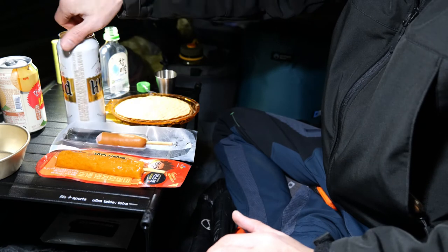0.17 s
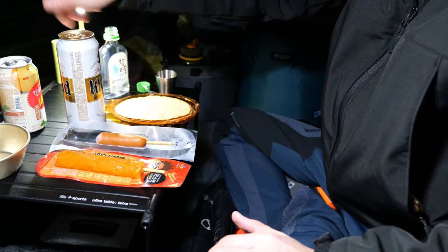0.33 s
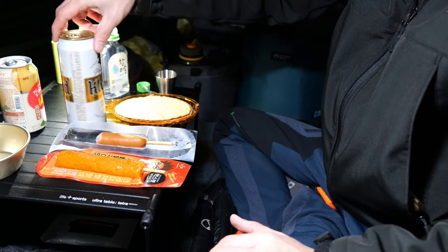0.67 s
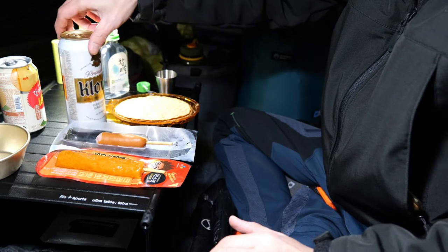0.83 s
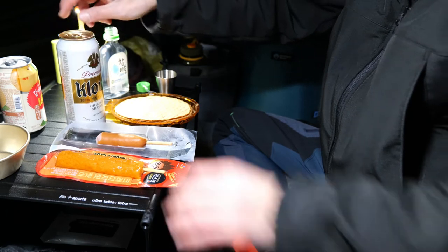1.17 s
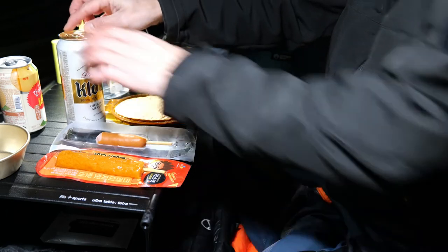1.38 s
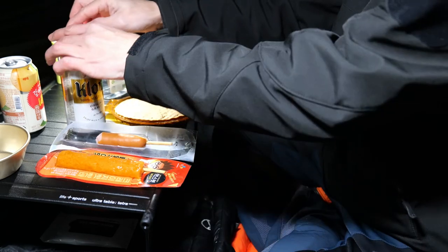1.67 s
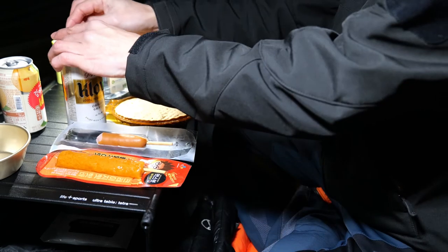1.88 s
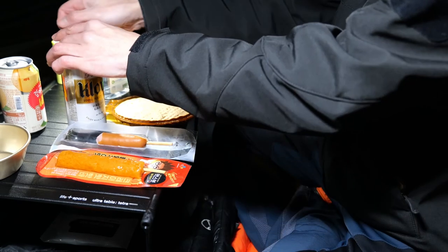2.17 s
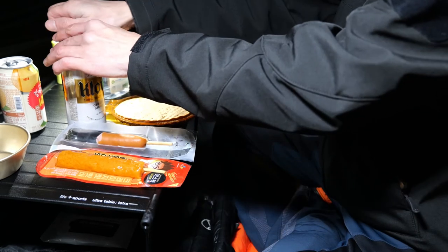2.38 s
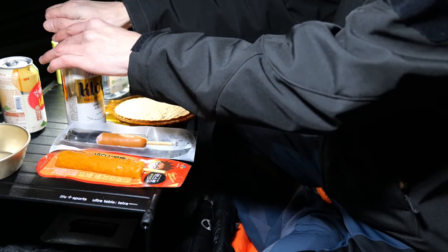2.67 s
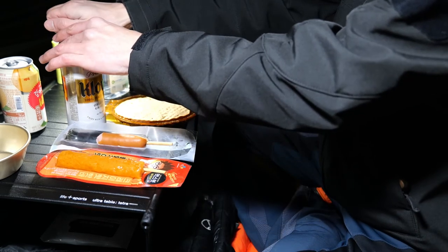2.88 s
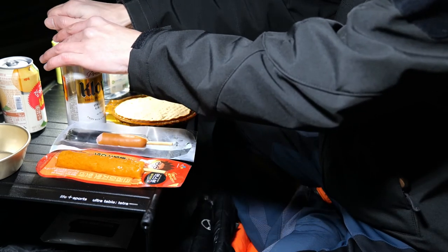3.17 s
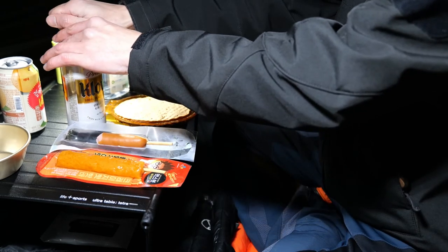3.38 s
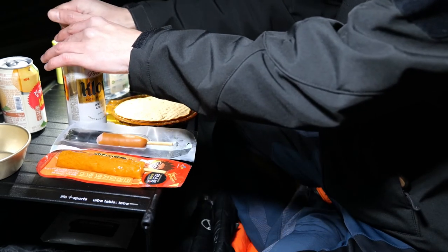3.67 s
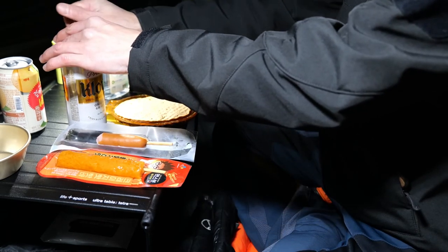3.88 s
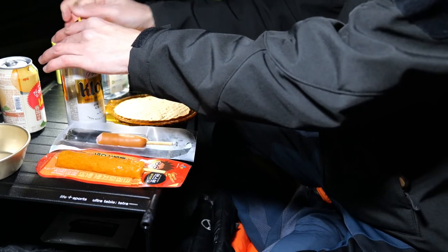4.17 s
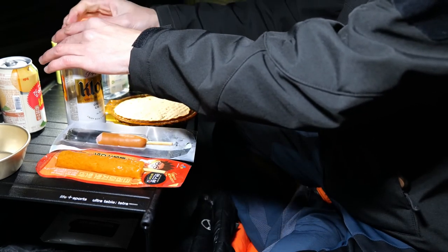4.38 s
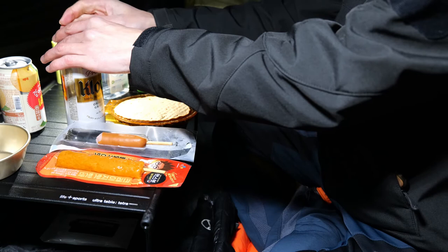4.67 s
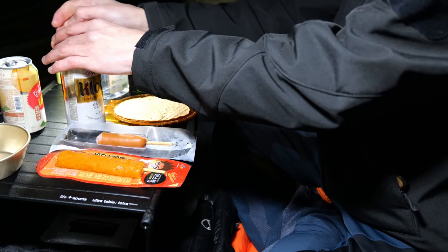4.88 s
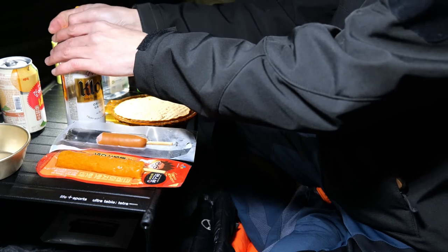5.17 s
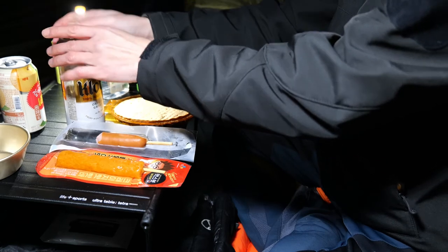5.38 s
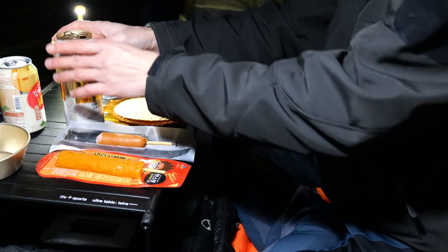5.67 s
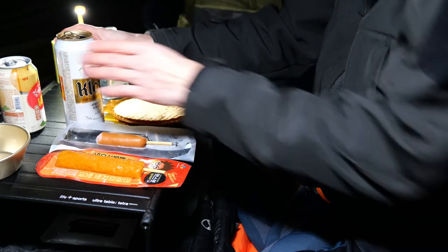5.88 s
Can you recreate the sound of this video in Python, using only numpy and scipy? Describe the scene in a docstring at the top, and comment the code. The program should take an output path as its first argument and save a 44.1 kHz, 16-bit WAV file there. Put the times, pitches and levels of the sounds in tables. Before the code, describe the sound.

Very close, outdoors on a quiet night. A full can drags and knocks briefly over a slatted metal table, twice. Nylon sleeves rustle with small taps. Then the ring pull cracks, gas hisses for under half a second, and two very loud metallic snaps tear the lid, the last distorting. The opened can rings faintly, small ticks follow, and a sleeve swishes at the end.

```python
"""Outdoors at night, a slatted metal camp table, heard up close in narrow stereo. A hand slides a full drink
can over the slats, whose modes ring, then levers its ring pull: a crack, a jet of gas (shaped noise), two loud
snaps as the lid tears, small ticks of the tab (bursts and damped modes). The drag hisses and nylon sleeves rustle
in grainy noise; the air is quiet noise with a faint wavering hum. The loudest snaps are clipped at full scale."""
import sys
import numpy as np
from scipy import signal
from scipy.fft import rfft, irfft
from scipy.io import wavfile
from scipy.ndimage import uniform_filter1d

SR = 44100
rng = np.random.default_rng(int(sys.argv[2]) if len(sys.argv) > 2 else 0)


def dump_mix(stems):
    """Bounce the given channels to the path in sys.argv[1] as a 16-bit WAV at rate SR."""
    frames = np.atleast_2d(stems).T  # one column per channel
    limited = np.clip(frames, -1, 1)  # hard clip at full scale
    pcm = np.round(limited * 32767).astype(np.int16)
    wavfile.write(sys.argv[1], SR, pcm)


N = 265834  # samples


def amp(db):
    """Amplitude factor of a level in dB."""
    return 10 ** (np.asarray(db) / 20)


def evened(x):
    """Scales x to an rms of 1."""
    return x / np.sqrt(np.mean(x ** 2) + 1e-20)


def read(points, hz):
    """Reads a curve of (f/Hz, dB) points, straight over log frequency."""
    f, value = np.transpose(points)
    return np.interp(np.log(hz + 1), np.log(f + 1), value)


def add(mix, s, sound):
    """Lays a sound into the mix from s seconds on."""
    part = mix[max(round(s * SR), 0):][:len(sound)]
    part += sound[:len(part)]


def octaves(hz):
    """Distance from about 4 kHz in octaves, eased in the deep bass."""
    return np.log2((hz + 50) / 4000)


def resonate(x, hz, width):
    """Resonance: shifts the curve hz down to zero, smooths, and shifts back."""
    turn = np.exp(2j * np.pi * np.cumsum(hz * np.ones(len(x))) / SR)
    r = np.exp(-np.pi * width / SR)
    return 2 * (turn * signal.lfilter([1 - r], [1, -r], x / turn)).real


def noise(colour_db, tilt, patchy_db, flicker_db):
    """Random short-time spectra of rms 1 with patches, flicker and a tilt (dB per octave) that moves in time."""
    size, hop = 512, 128  # samples
    frames, hz = N // hop + 5, np.fft.rfftfreq(size, 1 / SR)
    real, imaginary, patches = rng.standard_normal((frames, len(hz), 3)).T
    patches = uniform_filter1d(patches, size=6, axis=0)  # over frequency
    patches = evened(uniform_filter1d(patches, size=14, axis=1))  # over time
    flicker = evened(uniform_filter1d(rng.standard_normal(frames), size=2))
    frame_tilt = tilt[np.minimum(np.arange(frames) * hop, N - 1)]
    shape = amp(colour_db(hz)[:, None] + np.outer(octaves(hz), frame_tilt))
    shape = shape / np.sqrt((shape ** 2).mean(axis=0))  # the tilt leaves the level alone
    shape = shape * amp(patchy_db * patches + flicker_db * flicker)
    spectra = (real + 1j * imaginary) * shape
    return evened(signal.istft(spectra, nperseg=size, noverlap=size - hop)[1][:N])


def played(rows):
    """Gain and tilt over time of strokes that rise, hold and fall smoothly."""
    t = np.arange(N) / SR
    s, rise, hold, fall, db, tilt = np.transpose(rows)[:, :, None]
    end = s + rise + hold + fall
    opened = np.clip(np.minimum((t - s) / rise, (end - t) / fall), 0, 1)
    gain = amp(db) * np.sin(np.pi / 2 * opened) ** 2
    total = gain.sum(axis=0)
    return total, (gain * tilt).sum(axis=0) / (total + 1e-9)


# Loss at the top of every snap: f/Hz, level/dB
SNAP_TOP = [(13000, 0), (15000, -3), (16500, -25)]
SKIRT = 0.8  # the loss grows as this power of the distance in octaves


def skirts(hz, centre_hz, below_db, above_db):
    """Loss in dB on either side of a snap's centre frequency."""
    away = np.log2((hz + 50) / centre_hz)
    return -np.where(away < 0, below_db, above_db) * abs(away) ** SKIRT + read(SNAP_TOP, hz)


# Snaps and ticks of lid and tab: t/s, level/dB, centre f/Hz, loss an octave below/dB, loss an octave above/dB,
# damping by the fingers (factor on ring time)
SNAPS = [(0.284, -34.5, 3010, 10, 19, 0.96), (0.814, -24.5, 2400, 16, 10.5, 0.73),
         (1.864, -41.5, 1210, 15, 5.5, 1), (1.9196, -33.5, 2400, 17, 8.5, 1),
         (1.957, -40, 2400, 11, 6, .75), (2.3168, 1, 3950, 27, 13.5, 0.61),
         (2.9938, 1, 4950, 7, 15.5, 0.77), (3.106, -30.5, 3860, 22, 20, 1),
         (3.1532, -33.5, 3850, 20, 27, 1), (3.184, -22, 3900, 8, 15.5, .88), (3.1956, -31, 3800, 5, 19, 1),
         (3.2257, -29, 1200, 2, 10, 1), (3.2381, 11.5, 2810, 12.5, 12, .42),
         (3.4553, -44.5, 2400, 14, 5, 1), (3.5117, -38.5, 3800, 4, 1, 0.56),
         (3.5717, -30.5, 7500, 1, 0, 0.78), (3.596, -34, 7500, 2.5, 2, .85),
         (3.6304, -51, 7500, 5.5, 10, .85), (3.916, -32, 3010, 7, 12, 0.74),
         (4.22, -44.5, 8300, 3.5, 4.5, .83), (4.2434, -46, 12000, 6.5, 3, .88),
         (5.0342, -25, 1500, 18.5, 3.5, .64), (5.26, -43, 2400, 8.5, 10, .76)]
# Modes of the lid, before damping: f/Hz, level/dB, t60/s
LID_MODES = [(560, -1, .035), (700, -3, .03), (1000, -1, .04), (1380, -1, .03), (1890, -4, .03),
             (2135, -4, .03), (2500, -3, .03), (2640, -.1, .035), (3220, -3, .035), (3415, -4, .04),
             (3820, -.1, .025), (4150, -5, .04), (4520, -7, .04), (4900, -1, .035), (5360, -3, .045),
             (5700, -6, .04), (6100, -6, .04), (6700, -3, .03), (7150, -1, .03), (7800, -3, .03),
             (8240, -2, .028), (8790, -1, .025), (9290, -3, .025), (9850, -3, .025), (10500, -3, .022),
             (11500, -1, .02), (12600, -2, .018), (13600, -2, .018), (14600, -2, .018)]
SNAP_RISE_MS = .45
CRACK_DB, CRACK_T60 = -11, 0.021  # dB, s


def lid():
    """Each snap is a short crack that rings the lid's modes, weighted by where and how it tears."""
    out, t = np.zeros(N), np.arange(4096) / SR
    hz, mode_db, t60 = np.transpose(LID_MODES)
    bins = np.fft.rfftfreq(len(t), 1 / SR)
    rise = 1 - np.exp(-(1e3 * t / SNAP_RISE_MS) ** 2)
    for s, db, *colour, damping in SNAPS:
        # each snap's high modes are detuned at random
        detuned_hz = hz * (1 + .02 * np.clip(octaves(hz), 0, 2) * rng.standard_normal(len(hz)))
        phase = 0.72 * rng.standard_normal((len(hz), 1))
        ring_t60 = max(damping, .1) * t60[:, None]
        level = amp((mode_db + skirts(hz, *colour))[:, None] - 60 * t / ring_t60)
        ring = (level * np.sin(2 * np.pi * np.outer(detuned_hz, t) + phase)).sum(axis=0)
        bass_loss = 2 * np.minimum(octaves(bins) + 1.5, 0)
        crack_shape = amp(skirts(bins, *colour) + bass_loss)
        crack = evened(irfft(rfft(rng.standard_normal(len(t))) * crack_shape))
        snap = rise * (ring / 2 + crack * amp(CRACK_DB - 60 * t / CRACK_T60))
        add(out, s, amp(db) * snap)
    return out


# Brief rips of the scored metal: t/s, length/ms, level/dB, centre f/Hz, spread/octaves
TEARS = [(2.324, 11.5, -32.5, 4500, 0.44), (2.9919, 2, -15.5, 3930, 0.47), (2.997, 24.5, -28.5, 5190, 0.5),
         (3.028, 15.4, -27, 5000, 0.26), (5.033, 5.4, -34, 1850, 0.22), (3.186, 17, -40.5, 4000, 0.78),
         (3.2354, 4.9, -13, 2454, 1.1), (3.2416, 7, -16.5, 3600, 0.51), (3.248, 10.5, -31, 6010, .6),
         (3.514, 12, -53, 8000, 1.3)]


def rips():
    """Tearing metal: a noise burst drives the lid's modes around one centre."""
    hz, mode_db, t60 = np.transpose(LID_MODES)
    out, t = np.zeros(N), np.arange(1500) / SR
    for s, ms, db, centre_hz, spread in TEARS:
        near_db = -3.8 * (np.log2(hz / centre_hz) / spread) ** 2
        level = amp((mode_db + near_db)[:, None] - 60 * t / (.4 * t60[:, None]))
        ring = (level * np.sin(2 * np.pi * np.outer(hz, t))).sum(axis=0)
        drive = rng.standard_normal(len(t)) * np.sin(np.pi * np.clip(1e3 * t / ms, 0, 1)) ** 1.3
        add(out, s, amp(db) * signal.fftconvolve(drive, ring / np.linalg.norm(ring)))
    return out


# Close mode pairs of the opened can: f/Hz, beats per second, first swell after the start t/s, level/dB, t60/s
WALL_MODES = [(1005, 15, .03, -26, 0.42), (522, 11.5, .065, -33, 0.58), (383, 8, .035, -37, 1),
              (930, 12, .03, -44, .3), (317, 9.3, 0.046, -43, 1.6), (275, 6, 0.073, -47, 1.1),
              (1125, 30, 0.042, -37, 0.14), (1360, 25, .022, -38, .12)]
WALL_START = 3.24  # s


def can_wall():
    """The opened can rings on: pairs of modes a few hertz apart swell and fade as they die away."""
    out, t = np.zeros(N), np.arange(SR) / SR
    rise = 1 - np.exp(-t / .05)
    for hz, beats, swell_s, db, t60 in WALL_MODES:
        beating = np.cos(np.pi * beats * (t - swell_s))
        add(out, WALL_START, amp(db - 60 * t / t60) * beating * np.sin(2 * np.pi * hz * t) * rise)
    return out


# Gas, the long first jet and a puff as the lid tears: start t/s, rise/s, hold/s, fall/s, level/dB,
# treble tilt/dB per octave
JETS = [(2.355, 0.055, 0.17, 0.17, -35.5, 0.55), (2.995, .004, 0.019, 0.053, -43.5, 2)]
# Relative spectrum of the jet: f/Hz, level/dB per Hz
JET_COLOUR = [(290, -29), (500, -10), (1620, -11.5), (1870, -7), (2070, -9), (3390, -3.5), (4150, -1),
              (5800, -8.5), (8450, -1.5), (10800, -6.5), (13400, -7.5), (15300, -11), (16000, -40)]
# Dips and peaks that lid and cupped hands put on it: f/Hz, width/Hz, level/dB
JET_SHAPE = [(3360, 91, -25), (5740, 180, -5), (7500, 130, -13), (10760, 330, -12), (13700, 150, -10),
             (5080, 230, 3.5)]


def gas():
    """Turbulent jet through the slit: noise coloured by lid and hands."""
    def colour_db(hz):
        bumps_db = sum(db * np.exp(-((hz - f) / w) ** 2) for f, w, db in JET_SHAPE)
        return read(JET_COLOUR, hz) + bumps_db
    gain, tilt = played(JETS)
    return gain * noise(colour_db, tilt, patchy_db=1.1, flicker_db=0.7)


# The can's base drags on the slats: start t/s, rise/s, hold/s, fall/s, drive level/dB, treble tilt/dB per octave
DRAGS = [(0, 0.0023, 0.027, 0.11, -41, 3.5), (.1, 0.017, 0.037, 0.078, -39.5, 0.5),
         (.648, .012, 0.023, 0.12, -39, -1), (.76, 0.035, .005, .1, -42.5, -2)]
# Modes of the table's slats, before damping: f/Hz, relative level/dB, t60/s
SLAT_MODES = [(353.5, -1, 0.33), (448, -6, 0.14), (621, -4, 0.056), (945, -8, .1), (1208, -7, 0.15),
              (1390, 3, 0.038), (1584, -5.5, 0.13), (1910, -12, 0.083), (2345, -6.5, 0.16),
              (2740, -15.5, 0.11), (3250, -16, 0.08), (4060, -19, 0.06), (5420, -15, 0.074),
              (8330, -24, 0.072)]


def table():
    """Uneven slips of the dragged can ring the slats, which its weight damps."""
    gain, tilt = played(DRAGS)
    size = amp(4.3 * np.minimum(rng.exponential(1, N), 3))
    slips = size * (rng.random(N) < 900 / SR) * rng.choice([-1, 1], N)  # about 900 a second
    drive = gain * evened(slips)
    out, t = np.zeros(N), np.arange(SR // 2) / SR
    for hz, db, t60 in SLAT_MODES:
        mode = amp(-60 * t / (0.59 * t60)) * np.sin(2 * np.pi * hz * t)
        tilted = drive * amp(tilt * (octaves(hz) + 2.5))
        out += amp(db - 9) * signal.oaconvolve(tilted, mode / np.linalg.norm(mode))[:N]
    return out


# The can bumps a slat: t/s, level/dB, treble tilt/dB per octave, time until the can's weight stills the ring/s
BUMPS = [(0.0, -26, -4, 0.029), (0.12, -33, 0.5, 0.093), (0.657, -31.5, -5, 0.011),
         (0.688, -31.5, -2.5, 0.0092), (0.779, -44.5, 0, .03), (0.832, -53, 2, 0.076)]


def bumps():
    """A bump starts all slat modes at once; they are stilled after a moment."""
    hz, mode_db, t60 = np.transpose(SLAT_MODES)
    out, t = np.zeros(N), np.arange(SR // 5) / SR
    for s, db, tilt, still_s in BUMPS:
        turn = rng.random((len(hz), 1))
        level = amp((mode_db + tilt * (octaves(hz) + 4.5))[:, None] - 60 * t / (1.3 * t60[:, None]))
        ring = (level * np.sin(2 * np.pi * (np.outer(hz, t) + turn))).sum(axis=0)
        stilled_db = -60 * np.maximum(t - still_s, 0) / 0.027
        add(out, s, amp(db + stilled_db) * np.minimum(t / 0.0013, 1) * ring)
    return out


# Dull knocks of can, fingers and cuffs: t/s, peak level/dB, f/Hz
KNOCKS = [(0.118, -21.5, 1390), (0.283, -33.5, 1146), (0.291, -36, 767), (0.658, -39, 377),
          (0.686, -30, 1275), (0.75, -34.5, 1560), (0.779, -36, 1370), (0.829, -34, 2000),
          (0.969, -31.5, 610), (0.97, -37, 1360), (1.005, -36.5, 340), (1.029, -37.5, 960),
          (1.129, -43, 404), (1.176, -42.5, 600), (1.201, -41, 690), (1.223, -31.5, 1000),
          (1.251, -32, 880), (1.347, -37.5, 791), (1.399, -41, 390), (1.444, -42, 1540), (1.479, -43, 340),
          (1.573, -33, 530), (1.955, -41, 1420), (3.031, -36, 640), (3.106, -41, 637), (3.183, -35.5, 644),
          (3.198, -41.5, 680), (3.238, -19, 559), (3.969, -44, 380), (4.218, -41.5, 1640),
          (5.033, -36, 1200), (5.366, -39, 956), (5.483, -42.5, 707), (5.532, -47, 636),
          (5.868, -36.5, 338), (5.883, -39.5, 1090), (5.964, -38, 1980), (5.987, -34, 930),
          (6.01, -33.5, 825)]
KNOCK_T60, BODY_HZ, BODY_DB = 0.033, 436, -10.5  # s, Hz, dB against the tone


def knocks():
    """Quickly damped thumps: a tone over a shared low body, with a shorter tick above."""
    out, t = np.zeros(N), np.arange(SR // 5) / SR
    envelope = amp(-60 * t / KNOCK_T60) * (1 - np.exp(-(t / 0.00092) ** 2))
    body = amp(BODY_DB) * np.sin(2 * np.pi * BODY_HZ * t)
    for s, db, hz in KNOCKS:
        tone = np.sin(2 * np.pi * hz * t)
        tick = np.sin(2 * np.pi * 1.5 * hz * t) * amp(-6.5 - 60 * t / .008)
        knock = envelope * (body + tone + tick)
        add(out, s, amp(db) * knock / abs(knock).max())
    return out


# Strokes of rubbing noise, the hiss of the dragged can (first two), then sleeves: start t/s, rise/s, hold/s,
# fall/s, level/dB, treble tilt/dB per octave
RUBS = [(0, 0.0017, 0.1, 0.12, -44, -1), (.645, 0.027, .01, 0.34, -49.5, -1),
        (.94, 0.071, 0.083, .05, -51, 0), (1.13, 0.26, 0.027, 0.28, -48, 0.16),
        (1.84, .1, .01, 0.41, -60.5, 3), (3.25, 0.026, 0.24, 0.26, -54, -0.5),
        (4.1, 0.15, 0.92, .2, -66.5, 2.5), (5.3, 0.16, 0.2, .1, -57.5, .8),
        (5.66, 0.31, .2, 0.06, -43, 1.3)]
# Relative spectrum of the rubbing: f/Hz, level/dB per Hz
RUB_COLOUR = [(120, -9), (200, -20.5), (387, 2), (968, -10.5), (1040, -2.5), (2130, -10), (3970, -11),
              (6050, -21), (8900, -19), (14300, -35.5), (16000, -48.5)]
# The weave sings as the sleeve speeds up: t/s, f/Hz, level/dB
ZIP = [(5.77, 583, -52.5), (5.836, 676, -45), (5.884, 1160, -48.5), (5.904, 1060, -39), (5.95, 1460, -49),
       (5.98, 2260, -45), (6.0, 2460, -45)]
CRACKLES_PER_S, CRACKLES_DB = 180, -9.5  # level against the rubbing noise


def rubbing():
    """Drag hiss and sleeves: noise with dull crackles, and a fuzzy rising tone where the weave slides fast."""
    gain, tilt = played(RUBS)
    size = amp(6.4 * np.minimum(rng.exponential(1, N), 4)) * (rng.random(N) < CRACKLES_PER_S / SR)
    kind = rng.integers(0, 4, N)
    crackles = np.zeros(N)
    for k, hz in enumerate([420, 750, 1273, 2210]):
        crackles += resonate(resonate(size * (kind == k), hz, .6 * hz), hz, .6 * hz)
    grain = noise(lambda hz: read(RUB_COLOUR, hz), tilt, patchy_db=1.5, flicker_db=0.8)
    rub = gain * (grain + amp(CRACKLES_DB) * evened(crackles))

    s, hz, db = np.transpose(ZIP)
    t = np.arange(s[0], s[-1], 1 / SR)
    uneven = evened(uniform_filter1d(rng.standard_normal(len(t)), size=300))  # the stroke stutters
    pitch = np.interp(t, s, hz) * (1 + .035 * uneven)
    tone = evened(resonate(resonate(rng.standard_normal(len(t)), pitch, 120), pitch, 240))
    add(rub, s[0], amp(np.interp(t, s, db)) * tone * signal.windows.tukey(len(t), .1))
    return rub


# Relative spectrum of the night air: f/Hz, level/dB per Hz
AIR = [(12, -42), (20, -10), (68, -24), (98, 2), (116, -2), (130, -3.5), (198, -37.5), (270, -1.5),
       (446, -8.5), (485, -8.5), (1260, -7.5), (1960, -12.5), (5380, -22), (13500, -38), (16000, -40.5)]
# Relative spectrum of the faint noise of opposite sign left and right: f/Hz, level/dB per Hz
SIDE_NOISE = [(12, -36.5), (20, 6), (607, 2), (976, -12), (1610, -20.5), (3340, -22.5), (4420, -25),
              (4810, -25), (6010, -28), (6540, -6), (16000, -3.5)]
AIR_DB, SIDE_NOISE_DB = -53, -72.5  # rms
HUM_HZ, HUM_WIDTH, HUM_DB = 104.5, 16, -64.5  # Hz, Hz, dB rms


def night_air():
    """Quiet wide noise with a hum of narrow, wavering noise; fainter noise of opposite sign left and right."""
    flat = np.zeros(N)
    air = amp(AIR_DB) * noise(lambda hz: read(AIR, hz), flat, patchy_db=0.52, flicker_db=1.13)
    hum = resonate(rng.standard_normal(N), HUM_HZ, HUM_WIDTH)
    hum = evened(resonate(hum, HUM_HZ, HUM_WIDTH))
    side = amp(SIDE_NOISE_DB) * noise(lambda hz: read(SIDE_NOISE, hz), flat, patchy_db=1.5, flicker_db=.5)
    return air + amp(HUM_DB) * hum + np.outer([1, -1], side)


NEARBY_DB, NEARBY_T60 = -20.5, 0.13  # dB, s


def nearby(x):
    """Short scatter off table, bottles and bodies: a decaying noise tail."""
    t = np.arange(SR // 4) / SR
    tail = rng.standard_normal(len(t)) * amp(-60 * t / NEARBY_T60) * (1 - np.exp(-t / 0.0019))
    return amp(NEARBY_DB) * signal.fftconvolve(x, tail / np.linalg.norm(tail))[:N]


# Stereo width of near sounds: f/Hz, left minus right against the sum/dB
WIDTH = [(60, -15.5), (300, -23), (700, -27.5), (2000, -40), (5000, -34.5), (12000, -23.5), (16000, -20.5)]


def widened(x):
    """Stereo width of near sounds: a faint smeared copy, added left and subtracted right."""
    t = np.arange(512) / SR
    smear = rng.standard_normal(len(t)) * amp(-60 * t / .008)
    grid = np.linspace(0, 1, 65)  # 1 is half the sample rate
    colour = signal.firwin2(257, grid, amp(read(WIDTH, grid * SR / 2)))
    coloured = signal.oaconvolve(x, colour, "same")
    side = signal.oaconvolve(coloured, smear / np.linalg.norm(smear))[:N]
    return x + np.outer([1, -1], side)


def scene():
    """The can and table in narrow stereo, with scatter, gas, rubbing and night air."""
    # lid and slats are heard with little deep bass, the slats also without their top
    lid_band = signal.butter(N=2, Wn=200, btype="high", fs=SR, output="sos")
    slat_band = signal.butter(N=2, Wn=[220, 10000], btype="band", fs=SR, output="sos")
    metal = signal.sosfilt(lid_band, lid() + rips())
    slats = signal.sosfilt(slat_band, bumps() + table())
    hits, jet = metal + knocks(), gas()
    return widened(hits + slats) + can_wall() + nearby(hits + jet) + jet + rubbing() + night_air()


EDGE_HZ = 16400  # corner of the low-pass


def record(dry):
    """The loudest snaps are clipped at full scale; then a low-pass."""
    clipped = np.clip(dry, -1, 1)
    low_pass = signal.firwin(511, EDGE_HZ, window=("kaiser", 9), fs=SR)
    return signal.oaconvolve(clipped, low_pass[None], "same")


dry = scene()
out = record(dry)
dump_mix(out)
```